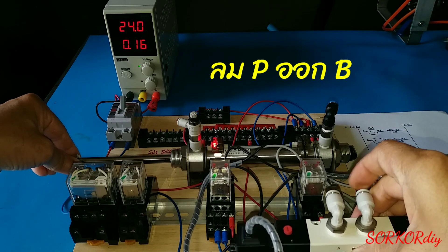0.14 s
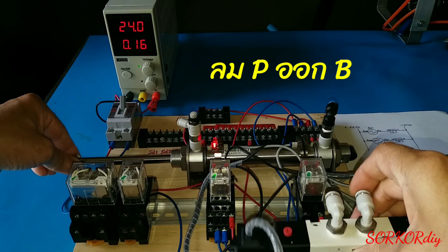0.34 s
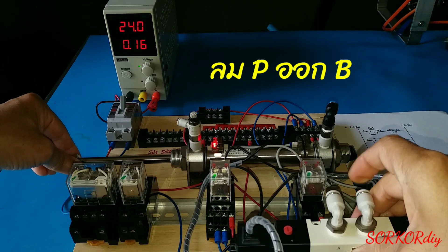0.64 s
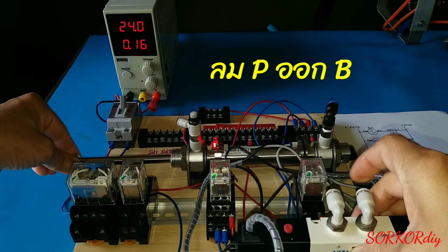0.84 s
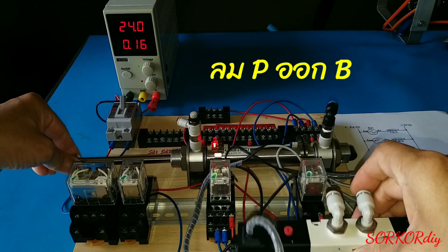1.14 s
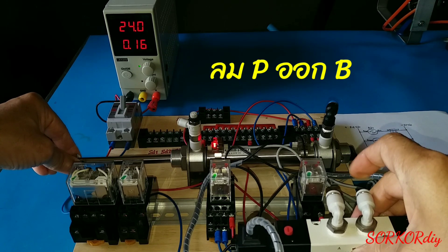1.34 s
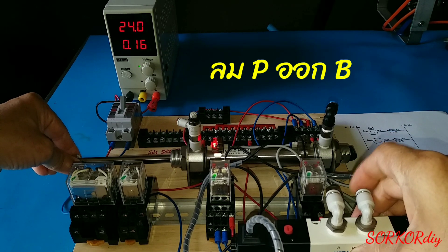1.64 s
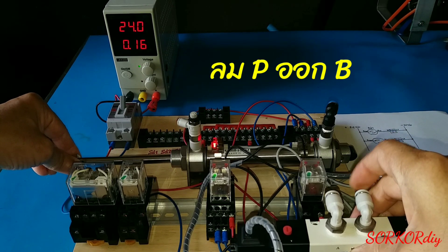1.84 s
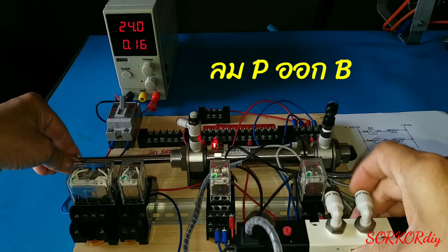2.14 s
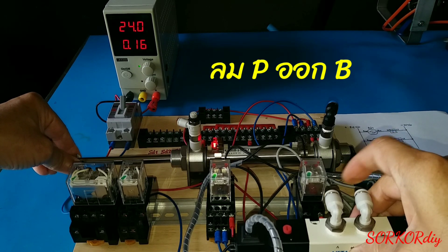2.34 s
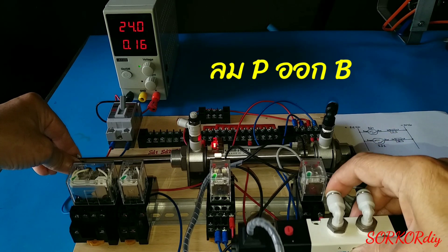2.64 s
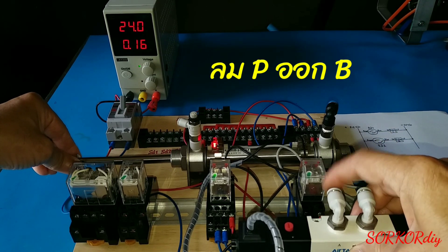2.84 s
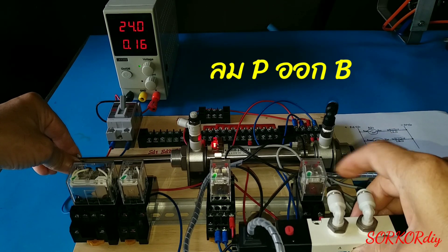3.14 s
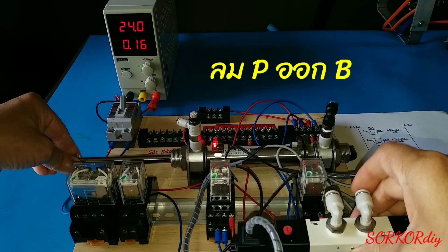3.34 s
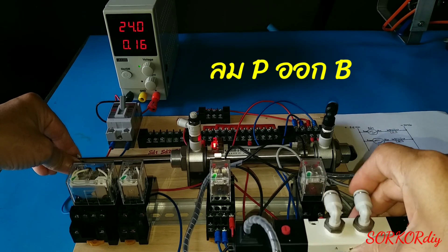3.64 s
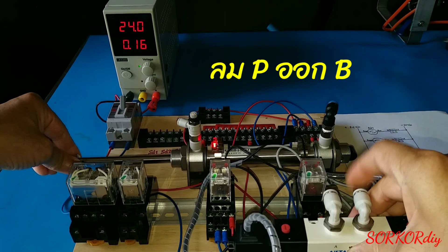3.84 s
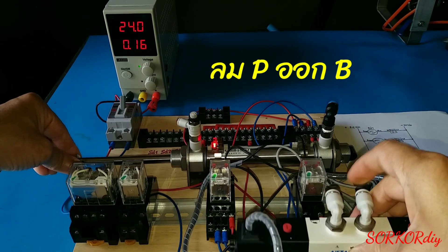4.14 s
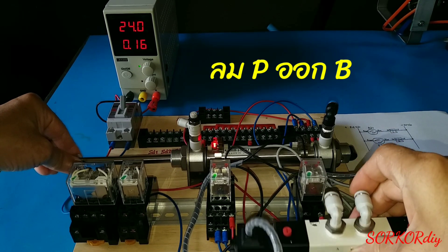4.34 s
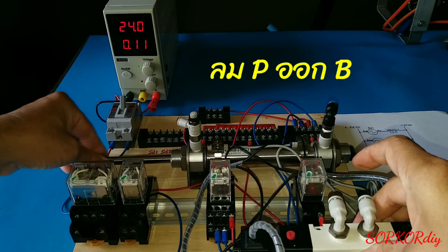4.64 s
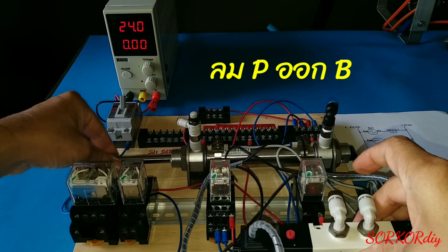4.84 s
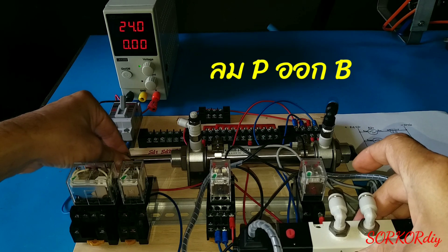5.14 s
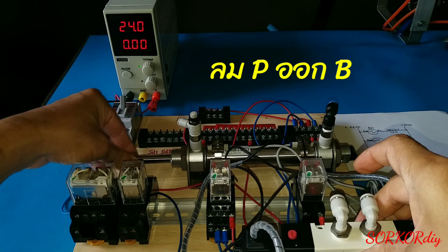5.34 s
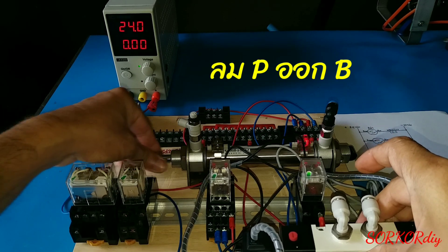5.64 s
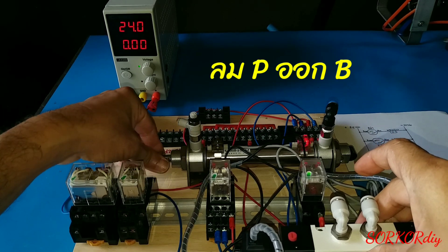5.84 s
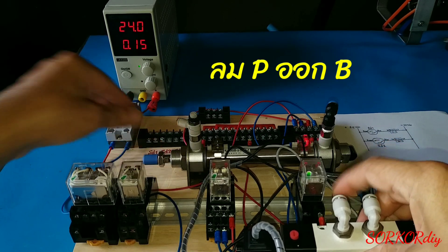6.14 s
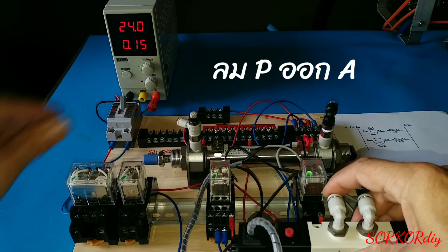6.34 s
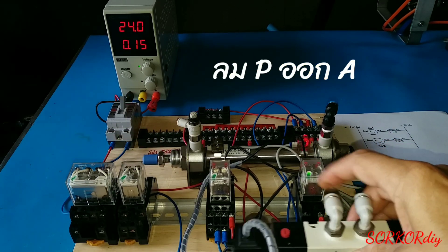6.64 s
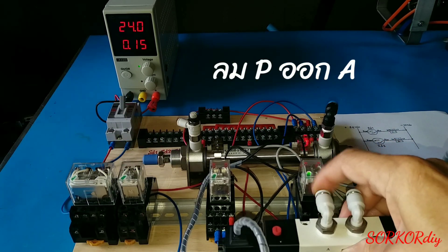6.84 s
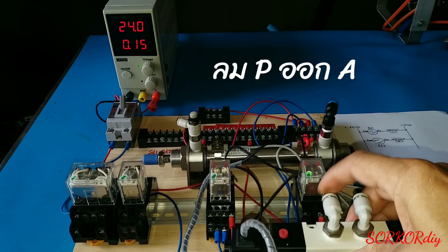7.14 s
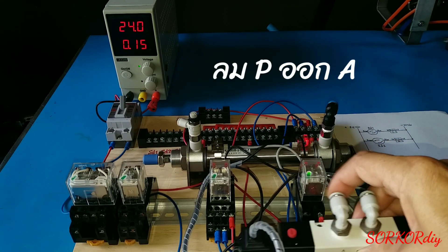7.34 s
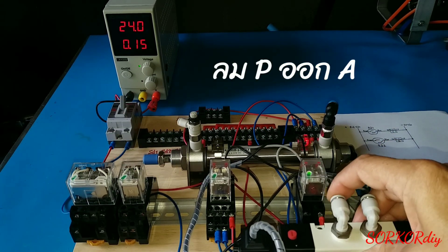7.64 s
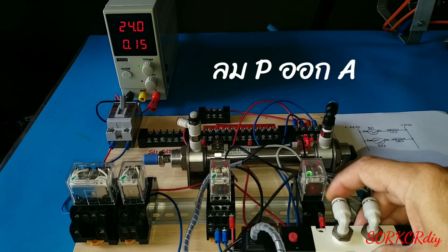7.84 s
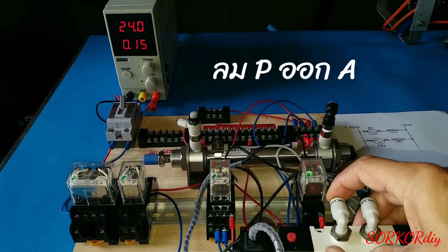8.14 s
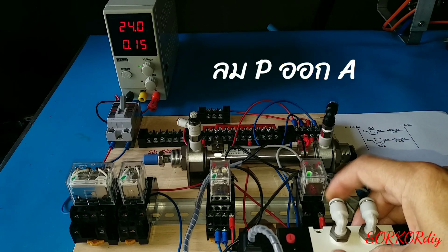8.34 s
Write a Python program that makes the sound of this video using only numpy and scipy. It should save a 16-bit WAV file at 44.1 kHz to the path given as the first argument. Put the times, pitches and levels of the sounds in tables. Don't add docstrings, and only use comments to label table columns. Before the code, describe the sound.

A compressed-air jet blasts continuously from a valve port on a workshop bench, very close to a stereo microphone pair. Its bright hiss is overlaid with gritty fizz and dense pops from overload. A finger repeatedly covers the port, making short dips with fat thuds at the edges. After an untapped stretch the valve shifts to a neighbouring port, the hiss changes tone, and faster taps follow to the end.

```python
import sys
import numpy as np
from scipy import signal
from scipy.io import wavfile
from scipy.ndimage import uniform_filter1d

SR = 44100
rng = np.random.default_rng(int(sys.argv[2]) if len(sys.argv) > 2 else 0)


def output_pcm(signal):
    pcm = np.clip(np.atleast_2d(signal).T, -1, 1) * 32767
    wavfile.write(sys.argv[1], SR, np.round(pcm).astype(np.int16))


def boost_factor(decibels):
    exponent = np.asarray(decibels, float) / 20
    return 10 ** exponent


N = 374850


def evened(x):
    return x / np.sqrt(np.mean(x ** 2, axis=-1, keepdims=True) + 1e-20)


def read(points, hz):
    f, *columns = np.transpose(points)
    return np.array([np.interp(np.log(hz + 1), np.log(f + 1), c) for c in columns])


def wander(seconds):
    span = max(round(seconds * SR), 1)
    smooth = uniform_filter1d(rng.standard_normal((2, N)), span)
    return evened(uniform_filter1d(smooth, span))


def causal(points):
    hz = abs(np.fft.fftfreq(4096, 1 / SR))
    log_gain = read(points, hz)[0] * np.log(10) / 20
    taps = np.fft.ifft(np.exp(np.conj(signal.hilbert(log_gain)))).real[:2048]
    return taps / np.linalg.norm(taps)


def filtered(x, impulse):
    return signal.oaconvolve(x, impulse[None])[:, :N]


def jet(level_db):
    # (frequency [Hz], left level [dB], right level [dB])
    first_port = [(40, -36, -36), (120, -38, -35), (400, -23, -25), (1500, -8, -11), (3570, -11, -14),
                  (5430, -10.5, -5), (6400, -18, -15.5), (6860, -24, -8.5), (7770, -8.5, -7),
                  (9450, -6, -3.5), (10300, -5, -1.5), (12100, -1, -2), (13400, -0.5, 8), (15100, 2, -8),
                  (15400, -7.5, -4.5)]
    second_port = [(40, -36, -36), (120, -28, -23), (400, -13, -7), (1500, -7.5, -28), (3500, -10.5, -21),
                   (5240, -16, -1.5), (6300, -15, -11), (7100, -16, -18), (7860, -7.5, -4),
                   (9600, -3.5, -7), (10600, -2, 1.5), (12000, -2, 0), (13300, -0.5, 5.5), (15600, -1, 2),
                   (16200, -1, -2)]
    # (frequency [Hz], width [Hz], level over the jet [dB])
    rings = [
        [(8500, 300, 3), (10250, 300, 2), (11250, 300, 2.5), (12850, 200, 3), (13450, 250, 3),
         (14350, 300, 2.5), (15350, 200, 2.5)],
        [(8400, 400, 1.5), (10200, 300, 1.5), (11050, 300, 2), (12850, 250, 3), (13450, 300, 1.5),
         (14100, 300, 1.5), (15350, 200, 2.5)],
    ]
    # (frequency [Hz], first-port likeness [0-1], first-port lead of the right [rad],
    # second-port likeness [0-1], second-port lead of the right [rad])
    pair_likeness = [(300, .3, 2, .2, 2), (3800, .3, 2.8, .2, 2.8), (5000, .6, 3.1, .2, 3),
                     (6000, .35, 3.1, .1, 3), (6800, .6, 3.1, .2, 2.8), (7700, .5, 3.3, .3, 2.6),
                     (9100, .3, 4.6, .4, 2.6), (10600, .58, 5.5, .5, 4), (12900, .82, 6.3, .68, 4.6),
                     (14200, .72, 7.1, .45, 5), (15600, .5, 8.7, .25, 5.4)]
    # (time [s], factor on likeness above 8 kHz [1], added lead [rad])
    hand = [(0, 1, 0), (2.3, 1.1, 0), (2.45, .6, -1), (3.15, .6, -1), (3.3, 1, 0), (4.45, 1, 0),
            (4.55, .4, .3), (5.7, .4, .3), (5.75, 1.1, .2), (6.2, 1, 0), (6.4, .8, -.9), (6.6, .8, 0),
            (6.9, 1.1, -1.6), (7.3, 1, -.6), (7.7, 1, .3), (8.5, .9, .3)]
    shift_s, settle_s, ring_left_over = 5.72, .7, .28
    patchy_db, stripes_db, flutter_db = 1.56, 2.2, .54
    frame, hop = 512, 128

    hz = np.fft.rfftfreq(frame, 1 / SR)
    t = np.arange(N // hop + 5) * hop / SR
    shifted, settled = t > shift_s, np.clip((t - shift_s) / settle_s, 0, 1)

    pair = read(pair_likeness, hz)[..., None]
    same, lead = np.where(shifted, pair[2:], pair[:2])
    hand_s, scatter, turn = np.transpose(hand)
    short_wave = np.clip((hz - 8000) / 3000, 0, 1)[:, None]
    same = np.clip(same * (1 + short_wave * (np.interp(t, hand_s, scatter) - 1)), 0, 1)
    lead = lead + short_wave * np.interp(t, hand_s, turn)

    first, second = read(first_port, hz)[..., None], read(second_port, hz)[..., None]
    rings_db = np.array([sum(db * np.exp(-((hz - f) / w) ** 2) for f, w, db in ear) for ear in rings])
    rings_db = rings_db[..., None] * (1 - settled * (1 - ring_left_over))
    a, b, c, d, patches, *stripes = rng.standard_normal((len(t), len(hz), 7)).T
    patches = uniform_filter1d(uniform_filter1d(patches, 5, 0), 40, 1)
    stripes = uniform_filter1d(np.array(stripes), size=180, axis=2)
    colour_db = first + settled * (second - first) + rings_db
    colour_db += patchy_db * patches / patches.std() + stripes_db * stripes / stripes.std()

    left = a + 1j * b
    right = same * left * np.exp(1j * lead) + np.sqrt(1 - same ** 2) * (c + 1j * d)
    spectrum = np.array([left, right]) * boost_factor(colour_db)
    hiss = signal.istft(spectrum, nperseg=frame, noverlap=frame - hop)[1][:, :N]
    hiss /= np.sqrt(uniform_filter1d(hiss ** 2, size=SR // 2))
    return hiss * boost_factor(level_db + 4.5 + flutter_db * wander(.013)[0])


def finger_taps(taps):
    before_s, after_s, knee_db = .022, .068, 4.5
    t, dip_db, splash = np.arange(N) / SR, np.zeros(N), np.zeros(N)
    for touch_s, *spans_s, db in taps:
        edges_s = touch_s + np.cumsum([0, *np.abs(spans_s)])
        dip_db += np.interp(t, edges_s, [0, db, db, 0])
        away = np.maximum((touch_s - t) / before_s, (t - edges_s[-1]) / after_s)
        strength = 1 - np.exp(-abs(db) / knee_db)
        splash = np.maximum(splash, np.exp(-np.maximum(away, 0)) * strength)
    covered = 1 - np.exp(-abs(dip_db) / knee_db)
    return dip_db, covered, splash


def drive_levels():
    # (time [s], level [dB], lean to the left [dB])
    aim = [(0.0, 1.36, 0), (0.82, 0.07, 0.95), (1.36, 0.5, -0.2), (1.73, -0.54, 0.7), (2.29, 1, 0.1),
           (2.72, -2.9, 0.5), (2.83, -0.5, 0.5), (3.15, -0.04, -0.1), (3.34, 0.34, 0.2), (4.38, -0.3, 0.6),
           (4.59, -0.64, -0.5), (5.58, 0.56, -0.29), (5.74, -1.6, -0.63), (6.14, 0.54, -0.6),
           (6.61, -0.26, 0.55), (7.44, 0.7, 0.2), (7.71, -0.3, 0.3), (8.5, -1.4, 0.4)]
    # (touch [s], closing [s], held [s], lifting [s], overload dip [dB])
    first_taps = [(0.025, 0.093, 0.0, 0.043, -7.5), (0.309, 0.044, 0.0, 0.067, -14),
                  (0.51, 0.11, 0.0056, 0.032, -15), (0.682, 0.018, 0.0082, 0.021, -3.5),
                  (0.751, 0.03, 0.043, 0.03, -9), (1.177, 0.036, 0.057, 0.019, -8),
                  (1.702, 0.037, 0.086, 0.067, -8), (1.988, 0.07, 0.026, 0.062, -18),
                  (2.196, 0.051, 0.037, 0.079, -13.5), (3.395, 0.044, 0.13, 0.041, -16.5),
                  (3.679, 0.06, 0.074, 0.079, -28), (4.048, 0.019, 0.037, 0.066, -16),
                  (4.261, 0.1, 0.026, 0.044, -19)]
    second_taps = [(6.205, 0.045, 0.039, 0.01, -9.5), (6.456, 0.098, 0.029, 0.06, -12.5),
                   (6.758, 0.034, 0.079, 0.026, -13.5), (6.919, 0.021, 0.0066, 0.032, -1.8),
                   (6.969, 0.093, 0.059, 0.064, -16.5), (7.372, 0.043, 0.052, 0.11, -14.5),
                   (7.633, 0.064, 0.0073, 0.062, -7.5), (7.733, 0.048, 0.002, 0.059, -17),
                   (7.893, 0.032, 0.023, 0.042, -5.5), (7.98, 0.034, 0.034, 0.087, -18.5),
                   (8.24, 0.035, 0.026, 0.084, -22), (8.435, 0.039, 0.05, 0.05, -15.5)]
    hiss_loss_db = [[[-3], [-0.4]], [[-3], [-2.5]]]
    hiss_splash_db = [[[-0.5], [2.6]], [[1.5], [1.5]]]
    load_dip_share = [[[1.02], [1.37]], [[1.01], [.86]]]
    load_splash_db = [[[4], [0.67]], [[4.5], [2.5]]]
    sway_s, hiss_sway_db, load_sway_db = .045, .55, 1.23

    aim_s, *columns = np.transpose(aim)
    aim_db, lean_db = (np.interp(np.arange(N) / SR, aim_s, c) for c in columns)
    lean_db, sway = lean_db * [[.5], [-.5]], wander(sway_s)
    hiss_db = [[-17], [-21]] + [[.79], [.72]] * aim_db + 1.5 * lean_db
    hiss_db = hiss_db + hiss_sway_db * (sway[0] + .5 * sway)
    load_db = [[-25], [-18]] + [[1.44], [.94]] * aim_db + lean_db + load_sway_db * wander(sway_s)
    for port, taps in enumerate((first_taps, second_taps)):
        dip_db, covered, splash = finger_taps(taps)
        hiss_db = hiss_db + hiss_loss_db[port] * covered
        hiss_db = hiss_db + hiss_splash_db[port] * (splash * (1 - covered))
        load_db = load_db + load_dip_share[port] * dip_db + load_splash_db[port] * splash
    return hiss_db, load_db


def overload(level_db):
    # (frequency [Hz], density [dB per Hz])
    fizz_spectrum = [(30, -36), (50, -13), (80, -6), (150, -5.5), (300, -9), (600, -4), (1100, -4),
                     (2000, -4), (3200, -7.5), (4200, -9), (4900, -18), (6000, -15.5), (8000, -34.5)]
    pop_spectrum = [(30, -35), (50, -13.5), (80, -8), (150, -2.5), (300, -1.26), (600, 2.5), (1100, 1.5),
                    (2000, -1), (3200, -6.5), (4300, -10), (7000, -29.5), (9000, -62)]
    knee_db, pops_per_s = np.array([[-16.5], [-21.5]]), np.array([[4000], [1300]])
    steep, spread_db, gust_db = 1.6, 2.5, 1.3

    drive, ceiling = boost_factor(level_db + [[3.4], [4.6]]), boost_factor([[-10.5], [-12.6]])
    level_db = -5 * np.log10(drive ** -4. + ceiling ** -4.) + gust_db * wander(.012)
    pop_share = 1 / (1 + boost_factor(-steep * (level_db - knee_db)) ** 2)
    rate_hz = pops_per_s * pop_share * boost_factor(level_db - knee_db) ** 2

    draw, sign = rng.random((2, 2, N))
    size = boost_factor(spread_db * np.minimum(rng.exponential(1, (2, N)), 5))
    kicks = (draw < rate_hz / SR) * np.sign(sign - .5) * size / np.sqrt(np.mean(size ** 2))
    kicks *= boost_factor(knee_db) * np.sqrt(SR / pops_per_s)
    pops = filtered(kicks, causal(pop_spectrum))

    rough = rng.standard_normal((2, N)) * boost_factor(1.7 * wander(.0016))
    steady = evened(rough) * boost_factor(level_db) * np.sqrt(1 - pop_share)
    return pops + boost_factor(-0.66) * filtered(steady, causal(fizz_spectrum))


def lone_pops():
    # (time [s], peak level [dB])
    pop_events = [(.337, -14), (0.384, -10.5), (.842, -23), (1.761, -13), (1.868, -13), (2.113, -16),
                  (2.302, -25), (3.867, -8), (4.297, -13), (6.264, -12), (6.323, -9), (6.802, -7.5),
                  (6.85, -16), (7.132, -8), (7.449, -14), (7.763, -9), (8.362, -19)]
    # (frequency [Hz], density [dB per Hz])
    thud_spectrum = [(60, -51), (250, 8.5), (600, 1.5), (1100, -2), (1800, -34), (4000, -28)]
    kicks, thud = np.zeros((2, N)), causal(thud_spectrum)
    for peak_s, db in pop_events:
        kicks[1, round((peak_s - .0007) * SR)] = boost_factor(db)
    return filtered(kicks, thud / abs(thud).max())


def rumble():
    # (frequency [Hz], density [dB per Hz])
    rumble_spectrum = [(20, -22), (45, -11), (90, 2), (160, -3), (300, -14), (800, -40)]
    return boost_factor([[-58], [-61]]) * filtered(rng.standard_normal((2, N)), causal(rumble_spectrum))


def scene():
    hiss_db, load_db = drive_levels()
    return jet(hiss_db) + overload(load_db) + lone_pops() + rumble()


def roll_off(x):
    return signal.sosfilt(signal.butter(12, 15940, fs=SR, output="sos"), x)


def record(dry):
    thin = signal.sosfilt(signal.butter(1, 40, "high", fs=SR, output="sos"), dry)
    band_limit = signal.firwin(511, 15520, window=("kaiser", 9), fs=SR)
    limited = signal.oaconvolve(thin, band_limit[None], "same")
    return roll_off(np.clip(limited, -1, 1))


dry = scene()
out = record(dry)
output_pcm(out)
```